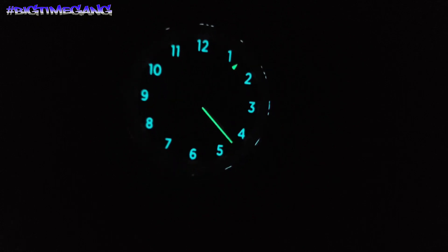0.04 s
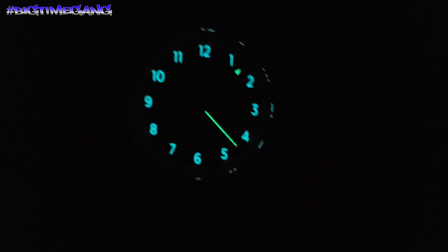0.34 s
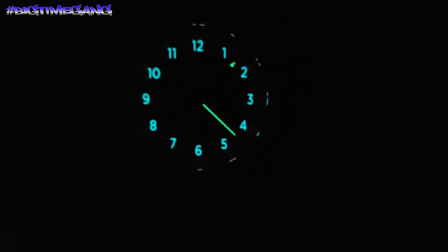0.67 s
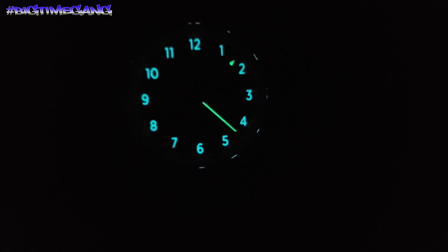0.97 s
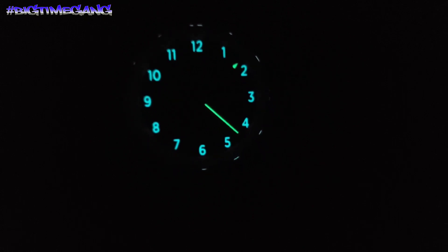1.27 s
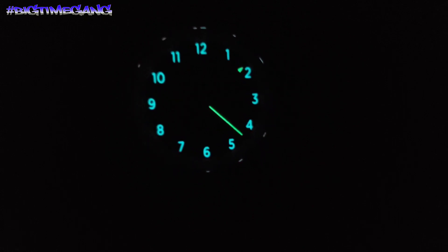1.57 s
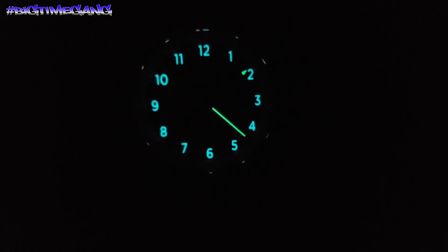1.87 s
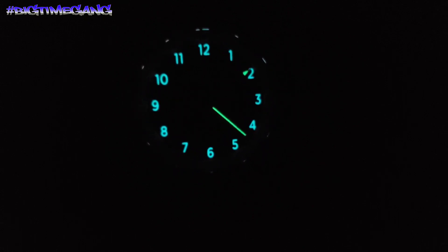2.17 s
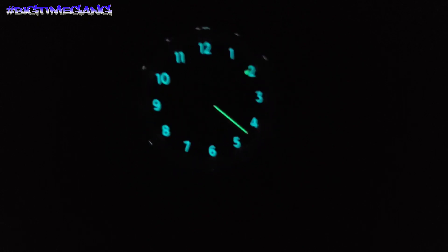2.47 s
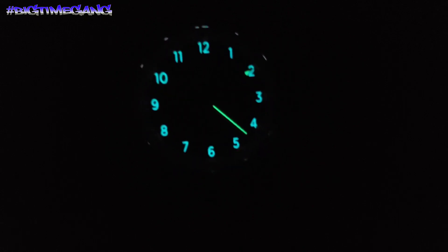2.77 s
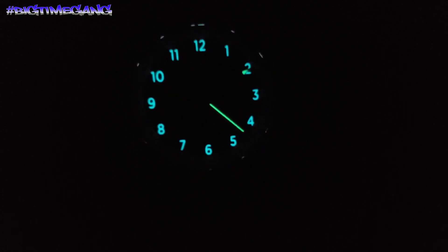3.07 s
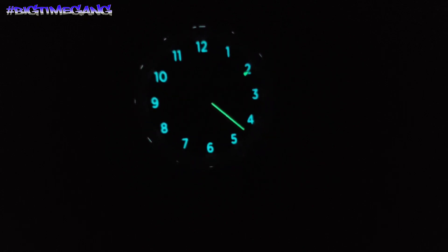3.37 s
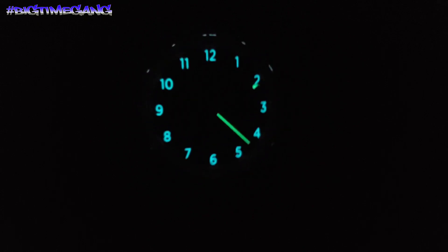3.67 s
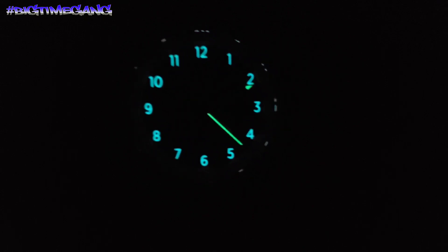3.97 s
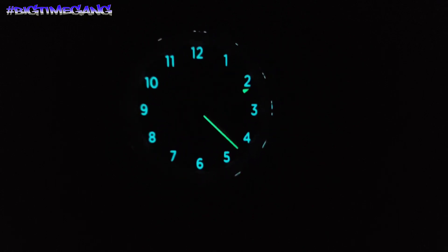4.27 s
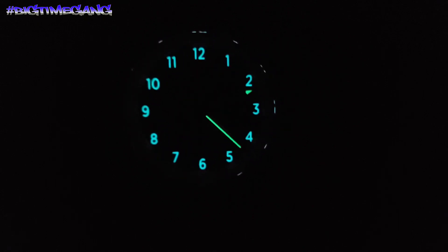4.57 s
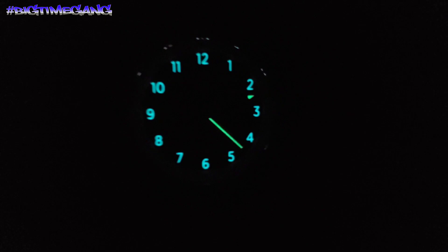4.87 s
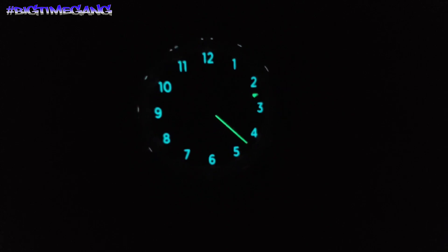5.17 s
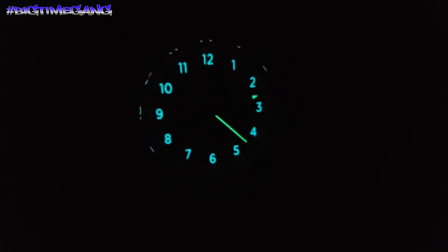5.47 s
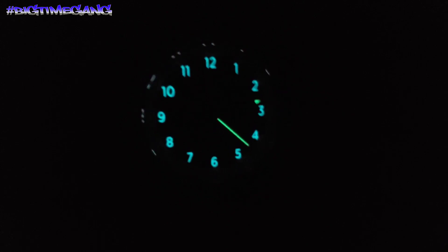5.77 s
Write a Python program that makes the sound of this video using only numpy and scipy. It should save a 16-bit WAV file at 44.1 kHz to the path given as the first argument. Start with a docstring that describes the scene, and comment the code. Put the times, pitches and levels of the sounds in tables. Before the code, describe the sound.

In a quiet room, fingers rub softly close to a hand-held microphone, with low rumble, soft bumps and faint, thin squeaks. About halfway through, a wristwatch crown gives a few light ticks, then snaps home in a quick cluster of bright clicks with a tiny metallic ring. A few fainter ticks follow. Dull ventilation noise, appliance hum and hiss continue underneath.

```python
"""A quiet room: fingers fumble with the crown of a wristwatch, right in front of a hand-held camera.
The crown ticks a few times and once snaps home in a quick run of contacts, each ringing the case.
Fingers rub softly on the camera near its two microphone ports and squeak faintly. The grip gives each
port its own low rumble and soft bumps. Behind it: ventilation noise, appliance hum, hiss."""
import sys
import numpy as np
from scipy import signal
from scipy.fft import rfft, irfft, next_fast_len
from scipy.io import wavfile
from scipy.ndimage import uniform_filter1d, map_coordinates

SR = 44100
rng = np.random.default_rng(int(sys.argv[2]) if len(sys.argv) > 2 else 0)


def transcribe(u):
    """Save the signal u as a 16-bit wav file named by the first command-line argument.

    u: samples, shape (n,) or (channels, n), limited to [-1, 1]; the rate is SR.
    q: integer samples, one column per channel.
    """
    v = np.clip(np.atleast_2d(u).T, -1, 1)
    q = np.round(v * 32767).astype(np.int16)
    wavfile.write(sys.argv[1], SR, q)


N = 265923

STROKE_RISE_DB_PER_S, STROKE_FALL_DB_PER_S = 391, 158  # finger bites, lifts


def amp(db):
    """Decibels to amplitude."""
    return 10 ** (np.asarray(db) / 20)


def unit(x):
    """Each channel at rms 1."""
    return x / np.sqrt(np.mean(x ** 2, axis=-1, keepdims=True) + 1e-20)


def along(points, hz):
    """Interpolate (freq_hz, value) points on a log axis."""
    freq_hz, values = np.transpose(points)
    return np.interp(np.log(hz + 1), np.log(freq_hz + 1), values)


def wobble(knots_per_s):
    """Smooth random curve."""
    knots = rng.standard_normal(int(N * knots_per_s / SR) + 4)
    return map_coordinates(knots, [np.arange(N) * knots_per_s / SR])


def filtered(x, response):
    """Filter x by the gain response(hz)."""
    size = next_fast_len(N + SR // 4)
    return irfft(rfft(x, size) * response(np.fft.rfftfreq(size, 1 / SR)), size)[..., :N]


def coloured(x, spectrum):
    """x shaped by a spectrum, at rms 1."""
    return unit(filtered(x, lambda hz: amp(along(spectrum, hz))))


def gesture(start_s, length_s, rise_db_per_s, fall_db_per_s, sag_db_per_s=0):
    """Gain of one movement: rises to 1 at start_s, holds or sags for length_s, falls."""
    t = np.arange(N) / SR - start_s
    rise_db = rise_db_per_s * np.maximum(-t, 0)
    sag_db = sag_db_per_s * np.clip(t, 0, length_s)
    fall_db = fall_db_per_s * np.maximum(t - length_s, 0)
    return amp(-rise_db - sag_db - fall_db)


def hiss(level_db):
    """Steady microphone hiss, partly shared by the two channels."""
    spectrum = [(300, 8.5), (1300, 3), (2000, 2), (3200, -0.5), (4000, -2), (5200, -5.5), (6500, -11.5),
                (8100, -30), (9500, -8.5), (11700, -0.5), (15400, 2.5)]  # hiss colour: freq_hz, gain_db
    balance = [(1000, 3.5), (3200, 3), (5300, 0), (7500, 13), (12000, 0.5)]  # channel balance: freq_hz, left_minus_right_db
    own, shared = rng.standard_normal((2, N)), rng.standard_normal(N)
    noise = coloured(own + 0.28 * shared, spectrum)
    return amp(level_db) * filtered(noise, lambda hz: amp(np.outer([.5, -.5], along(balance, hz))))


def room(noise_db, lean_left_db):
    """Dull ventilation noise, nearly alike at both ports, and a slightly unsteady appliance hum."""
    spectrum = [(20, -10.5), (45, -3), (65, -9.5), (90, -5.5), (150, -0.5), (200, 1), (290, 0.5), (360, -7),
                (450, -10.5), (560, -18), (680, -19.5), (900, -33), (1300, -31.5), (1600, -44),
                (3000, -50.5)]  # ventilation colour: freq_hz, gain_db
    width = [(40, -2), (120, -33.5), (250, -13.5), (500, -5.5), (1000, -1.5)]  # stereo width: freq_hz, side_minus_mid_db
    hum_tones = [(119.66, -62, -60), (239.2, -56, -61.5), (397.5, -74, -71)]  # appliance hum: pitch_hz, left_db, right_db
    mid, side = coloured(rng.standard_normal((2, N)), spectrum)
    side = filtered(side, lambda hz: amp(along(width, hz)))
    out = amp(noise_db) * np.array([amp(lean_left_db) * (mid + side), mid - side])
    t = np.arange(N) / SR
    for pitch_hz, left_db, right_db in hum_tones:
        phase = 2 * np.pi * pitch_hz * t + 0.36 * wobble(5)
        tone = np.sqrt(2) * np.sin(phase) * amp(0.4 * wobble(1.6))
        out += np.outer(amp([left_db, right_db]), tone)
    return out


def rumble(port, gain_db, lurch_db, lurches_per_s):
    """The shifting grip shakes one port in small lurches, over the tremor of the resting hand."""
    spectrum = [(18, -28.5), (30, -18.5), (45, -0.5), (62, -1.5), (85, -3), (115, -11.5), (170, -25.5),
                (300, -35), (700, -86)]  # handling colour: freq_hz, gain_db
    shifts = [(0.277, 0.28, -47.5, 0), (0.346, 0.3, -40.5, 1), (0.598, 0.12, -35.5, 0),
              (0.624, 0.18, -47.5, 1), (1.165, 0.56, -52, 1), (1.373, 0.16, -38, 1), (1.73, 0.19, -33, 1),
              (1.857, 0.3, -38.5, 0), (1.96, 0.25, -47, 1), (2.24, 0.26, -44.5, 0), (2.364, 0.15, -42.5, 1),
              (2.617, 0.31, -48.5, 1), (2.61, 0.9, -59.5, 0), (3.775, 0.08, -46.5, 0),
              (3.956, 0.42, -45, 1), (4.41, 0.93, -48.5, 0), (4.5, 0.041, -37.5, 1), (4.675, 0.2, -39.5, 1),
              (4.92, 0.2, -51, 1), (5.016, 0.36, -43, 0), (5.427, 0.67, -36.5, 0), (5.583, 0.37, -40, 1)]  # grip shifts: start_s, length_s, relative_db, port (0 left, 1 right)
    tremor_relative_db = -61.5
    shake = coloured(rng.standard_normal(N), spectrum)
    running_rms = np.sqrt(np.abs(uniform_filter1d(shake ** 2, size=3600)) + 1e-6)
    lurch = unit(amp(lurch_db * np.tanh(wobble(lurches_per_s))))
    power = amp(tremor_relative_db) ** 2
    for start_s, length_s, relative_db, shaken_port in shifts:
        if shaken_port == port:
            shift = gesture(start_s, length_s, rise_db_per_s=302, fall_db_per_s=200)
            power = power + (amp(relative_db) * shift) ** 2
    return amp(gain_db) * lurch * shake / running_rms * np.sqrt(power)


def bumps():
    """A soft push of flesh rocks the camera for a few cycles, mostly at one port."""
    # grip bumps: centre_s, level_db, pitch_hz, half_length_s, side (-1 left, 1 right)
    pushes = [(0.178, -32, 61, 0.016, 0.71), (0.415, -25.5, 89, 0.0097, 0.91),
              (0.55, -22.5, 76, 0.022, 0.71), (0.615, -21, 62.7, 0.012, -0.91),
              (0.691, -27, 92.6, 0.015, -0.78), (1.312, -29, 64.6, 0.011, 1),
              (1.508, -26, 67, 0.0073, 0.92), (1.758, -24, 50.3, 0.012, 0.55),
              (1.964, -22.5, 65.5, 0.018, -0.77), (2.248, -22, 71, 0.0093, -1.1),
              (2.298, -26, 64.5, 0.012, -1), (2.451, -25, 66, 0.0046, -1.1), (2.687, -30.5, 74, 0.0083, 1),
              (3.208, -36.5, 58, 0.012, -0.49), (3.604, -28, 69.6, 0.016, -1),
              (3.836, -29, 73, 0.011, 0.58), (4.54, -25, 72, 0.016, -0.47), (4.792, -22, 98, 0.0061, 0.94),
              (5.11, -29.5, 76.6, 0.01, 0.56), (5.377, -26, 63, 0.029, -1.2),
              (5.455, -20.5, 64, 0.028, -1.2), (5.736, -20.5, 54, 0.014, 0.63),
              (5.821, -23, 64.3, 0.0069, -1.1), (5.874, -25, 51.4, 0.013, 1)]
    overtone_ratio, overtone_db = 1.9, -12  # flesh stiffens as it is pressed
    t, out = np.arange(N) / SR, np.zeros((2, N))
    for centre_s, level_db, pitch_hz, half_length_s, side in pushes:
        swell = np.exp(-((t - centre_s) / half_length_s) ** 2)
        phase = 2 * np.pi * pitch_hz * (t - centre_s)
        overtone = amp(overtone_db) * swell * np.cos(overtone_ratio * phase + 2 * np.pi * rng.random())
        push = -amp(level_db) * swell * (np.cos(phase) + overtone)
        right_share = np.clip((1 + side) / 2, 0, 1)
        out += np.outer([1 - right_share, right_share], push)
    return out


def squeaks(waver_hz, stutter_db):
    """Thin, unsteady squeaks of sliding skin; the pitch sinks as the finger slows."""
    slips = [(0.745, 0.036, 5150, -78.5), (1.05, 0.35, 6440, -87), (5.075, 0.037, 5900, -74)]  # skin squeaks: start_s, length_s, pitch_hz, level_db
    sink_hz_per_s = 1400
    t, out = np.arange(N) / SR, np.zeros(N)
    for start_s, length_s, pitch_hz, level_db in slips:
        glide_hz = pitch_hz - sink_hz_per_s * (t - start_s) + waver_hz * wobble(400)
        envelope = gesture(start_s, length_s, STROKE_RISE_DB_PER_S, STROKE_FALL_DB_PER_S)
        out += amp(level_db) * envelope * np.sin(2 * np.pi * np.cumsum(glide_hz) / SR)
    return out * unit(amp(stutter_db * wobble(60)))


def pressure():
    """Rubbing strength at each port: strokes that ease off, over a light resting touch."""
    touch_db = [-82.5, -77]  # resting touch on the camera: left_db, right_db
    strokes = [(0.033, 0.24, -71.5, -62.5), (0.43, 0.15, -90, -75), (0.74, 0.24, -74.5, -65.5),
               (1.473, 0.086, -82, -76), (2.402, 0.052, -71, -64.5), (2.651, 0.055, -54, -48),
               (2.741, 0.055, -58.5, -53.5), (3.73, 0.18, -68, -68.5), (4.065, 0.2, -72.5, -64.5),
               (4.937, 0.074, -76, -73.5), (5.061, 0.036, -64, -63.5), (5.55, 0.13, -77, -72.5),
               (5.80, 0.22, -83, -77.5)]  # fingertip strokes near the ports: start_s, length_s, left_db, right_db
    power = amp(touch_db)[:, None] ** 2
    for start_s, length_s, left_db, right_db in strokes:
        stroke = gesture(start_s, length_s, STROKE_RISE_DB_PER_S, STROKE_FALL_DB_PER_S, sag_db_per_s=20)
        power = power + np.outer(amp([left_db, right_db]), stroke) ** 2
    return np.sqrt(power)


def rubbing(left_gain_db, right_gain_db, grain_db, grains_per_s, flutter_db):
    """Skin ridges catch and slip on the camera in tiny grains, under a pressure that flutters."""
    # rubbing colour at each port: freq_hz, gain_db
    left_colour = [(500, -10), (1300, -6), (2200, -10.5), (3300, -2), (3900, -7.5), (4700, -0.5),
                   (5800, 1.5), (6800, -7), (7800, -23), (9000, -14.5), (12000, -11), (14000, -9),
                   (15500, -34)]
    right_colour = [(500, -9), (1300, -26.5), (3000, -25), (5000, -26), (6400, -14.5), (8300, -21),
                    (9700, -18), (10800, -8.5), (11900, -2), (12900, -4), (13700, -12.5), (15500, -12.5)]
    resonances = [(3300, 90, 0.5), (4440, 380, 5), (5150, 200, 2), (11760, 90, 4)]  # excited by rubbing: centre_hz, width_hz, boost_db

    def resonance_gain(hz):
        return amp(sum(boost_db / (1 + (2 * (hz - centre_hz) / width_hz) ** 2)
                       for centre_hz, width_hz, boost_db in resonances))

    friction = unit(amp(grain_db * wobble(grains_per_s) + flutter_db * wobble(45)))
    left, right = filtered(friction * rng.standard_normal((2, N)), resonance_gain)
    left = amp(left_gain_db) * coloured(left, left_colour)
    right = amp(right_gain_db) * coloured(right, right_colour)
    return np.array([left, right]) * pressure()


def contact_response(spectrum, tilt_db_per_octave, size=512):
    """Impulse response of energy 1, tilted above 2 kHz: soft contacts are duller."""
    hz = np.fft.rfftfreq(size, 1 / SR)
    octaves = np.log2(np.maximum(hz, 2000) / 2000)
    cepstrum = irfft(np.log(amp(along(spectrum, hz) + tilt_db_per_octave * octaves)))
    cepstrum[1:size // 2] *= 2  # fold to minimum phase
    cepstrum[size // 2 + 1:] = 0
    response = irfft(np.exp(rfft(cepstrum)))
    return response / np.linalg.norm(response)


def case_ring(t, tilt_db_per_octave):
    """The watch case rings, with new mode strengths per contact; dull contacts favour low modes."""
    modes = [(1250, -26, 0.094), (1950, -18, 0.091), (2790, -14, .1), (3140, -18, .06), (4830, -8, 0.079),
             (8500, -18, .05), (12200, -17, 0.2), (12400, -15, .08), (12900, -7, .12), (13800, -15, 0.11),
             (13960, -4, 0.077)]  # case modes: freq_hz, relative_db, t60_s
    freq_hz, relative_db, t60_s = np.transpose(modes)[:, :, None]
    tilted_db = relative_db + tilt_db_per_octave * np.log2(freq_hz / np.median(freq_hz))
    envelopes = amp(tilted_db + 2 * rng.standard_normal(freq_hz.shape) - 60 * t / t60_s)
    phases = 2 * np.pi * (freq_hz * t + rng.random(freq_hz.shape))
    return np.sum(envelopes * np.sin(phases), axis=0)


def crown(gain_db, crack_t60_s, rattle_db, rattle_t60_s, room_db, room_t60_s, case_db):
    """Each contact: a crack, short rattle, case ring and faint room tail. Sliding ones rise slowly."""
    contacts = [(2.556, -65, -56.5, -4.5, .0004), (2.562, -55, -55, -2, 0.00048),
                (2.638, -61, -52, 8, .001), (2.649, -58, -42, -2, 0.0049), (3.078, -45, -44, -0.5, .005),
                (3.091, -53.5, -48, -1, 0.0011), (3.112, -55, -58, 2, .001), (3.444, -58, -42, 1, 0.0041),
                (3.451, -51, -50, -4, 0.0023), (3.472, -58, -52, -3, 0.0016), (3.733, -64, -57, -4, .0002),
                (4.599, -47, -64, -10, .004), (4.605, -39.5, -50, -4, 0.0032),
                (4.611, -34.5, -40.5, 4.5, 0.00011), (4.6135, -41, -36.5, 5, 0.00017),
                (4.6193, -35.5, -39.5, 2, 0.00018), (4.624, -51, -52, 2, .0002),
                (4.623, -48, -36, 11, .0002), (4.6265, -48, -38, 11, .0002), (4.632, -47, -49, 2, .0002),
                (4.914, -60.5, -63, -0.5, .0005), (4.949, -62, -60, -3, .0005),
                (5.544, -59, -72, -2, 0.0008)]  # crown contacts: start_s, left_db, right_db, tilt_db_per_octave, rise_s
    # contact colour at each port: freq_hz, gain_db
    left_colour = [(600, -35), (1300, -18), (1900, -16), (2300, -29.5), (3000, -4), (4000, -11), (4800, -3),
                   (5600, -9), (7000, -17), (7700, -23), (8400, -9), (11500, -21), (12900, 1), (14900, -9),
                   (15600, -13)]
    right_colour = [(600, -33), (1500, -15), (3500, -28), (4700, -54), (5800, -35), (6500, -22),
                    (8300, -23.5), (9100, -16), (10600, -6.5), (11500, -6), (12700, -1.5), (14200, -10),
                    (15600, -11)]
    t = np.arange(SR // 3) / SR
    rattle = amp(rattle_db - 60 * t / rattle_t60_s)
    room_tail = amp(room_db - 60 * t / room_t60_s)
    decay = amp(-60 * t / crack_t60_s) + rattle + room_tail
    out = np.zeros((2, N + SR))
    for start_s, left_db, right_db, tilt_db_per_octave, rise_s in contacts:
        attack = 1 - np.exp(-t / rise_s)
        for channel, port_db, colour in zip(out, (left_db, right_db), (left_colour, right_colour)):
            burst = attack * decay * rng.standard_normal(len(t))
            crack = signal.fftconvolve(burst, contact_response(colour, tilt_db_per_octave))[:len(t)]
            ring = amp(case_db) * attack * case_ring(t, tilt_db_per_octave)
            channel[round(start_s * SR):][:len(t)] += amp(port_db + gain_db) * (crack + ring)
    return out[:, :N]


def scene():
    """Handling, skin and crown, over the room and the microphone hiss."""
    handling = np.array([rumble(port, gain_db=1.2, lurch_db=0.5, lurches_per_s=31) for port in range(2)])
    handling += bumps()
    skin = rubbing(left_gain_db=0.0, right_gain_db=1.5, grain_db=0.5, grains_per_s=1100, flutter_db=1.0)
    skin += squeaks(waver_hz=130, stutter_db=2.5)
    ticks = crown(gain_db=3.5, crack_t60_s=0.0083, rattle_db=-16, rattle_t60_s=0.066,
                  room_db=-21.0, room_t60_s=0.26, case_db=-17.5)
    background = room(noise_db=-54.0, lean_left_db=1.68) + hiss(level_db=-69.5)
    return background + handling + skin + ticks


def record(dry):
    """The camera keeps nothing above its band limit."""
    limit_hz = 15600
    return filtered(dry, lambda hz: hz < limit_hz)


dry = scene()
out = record(dry)
transcribe(out)
```